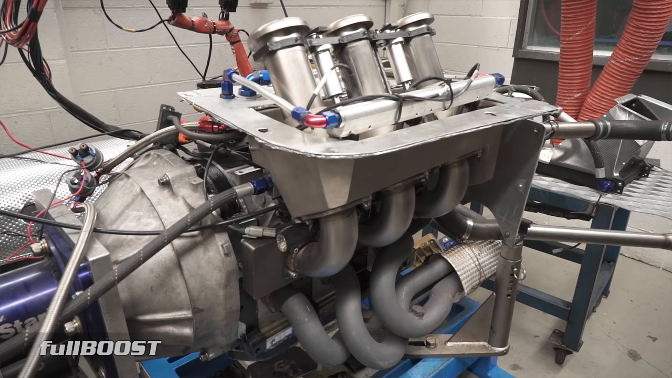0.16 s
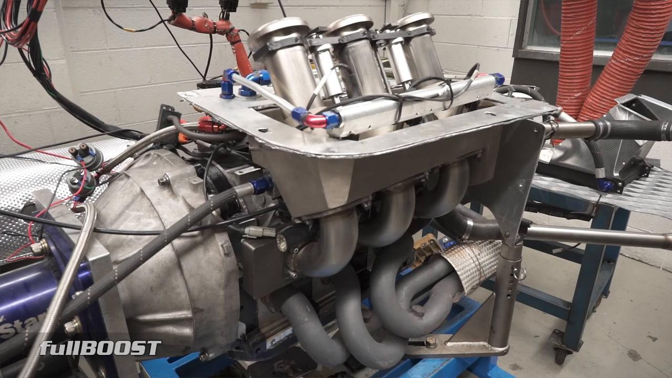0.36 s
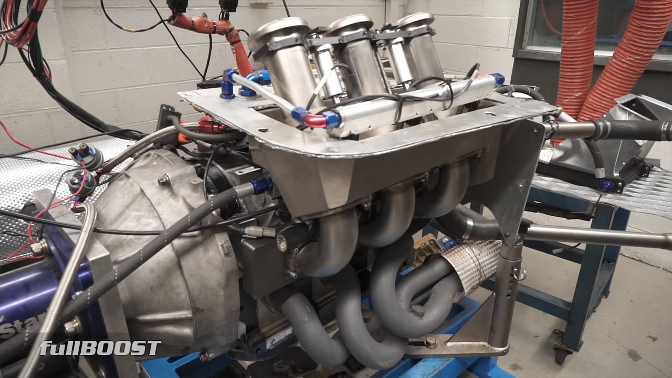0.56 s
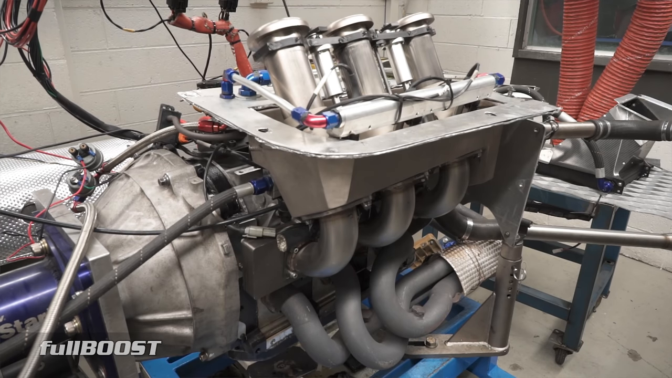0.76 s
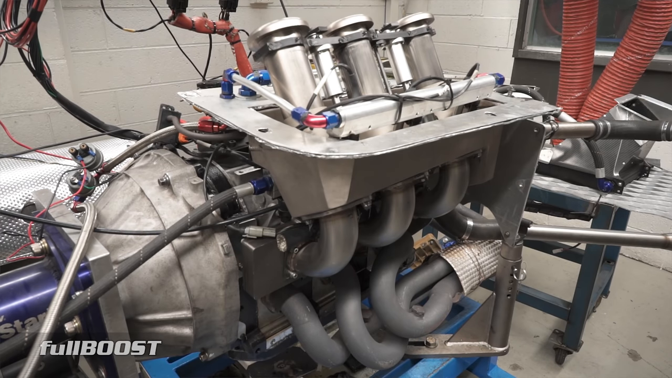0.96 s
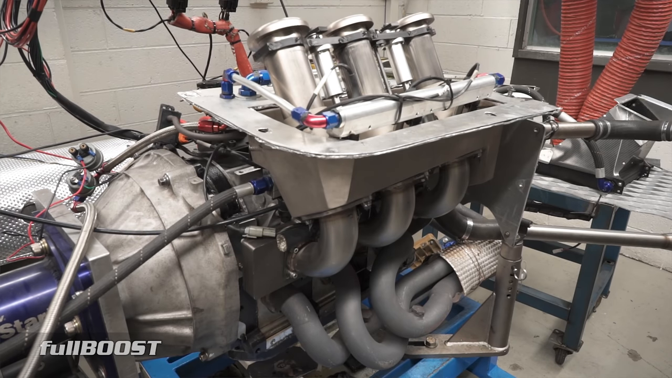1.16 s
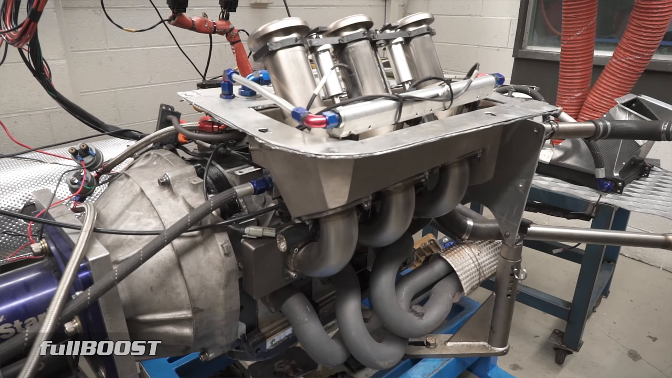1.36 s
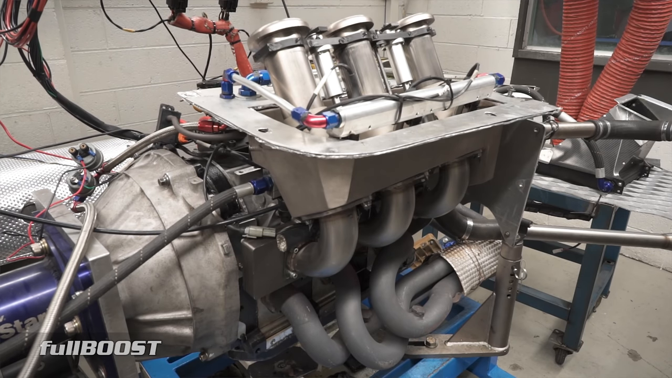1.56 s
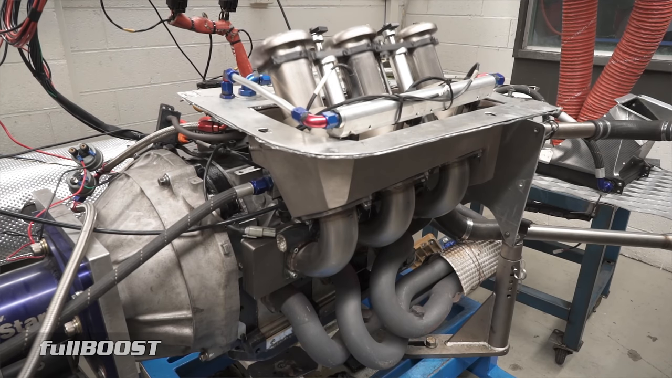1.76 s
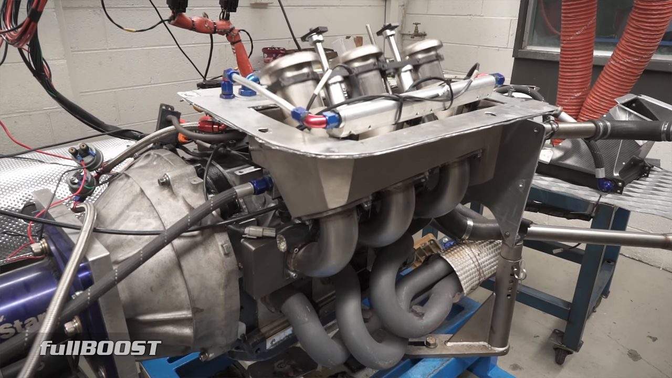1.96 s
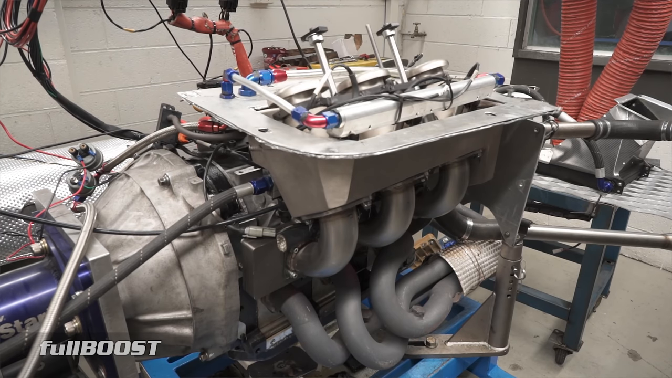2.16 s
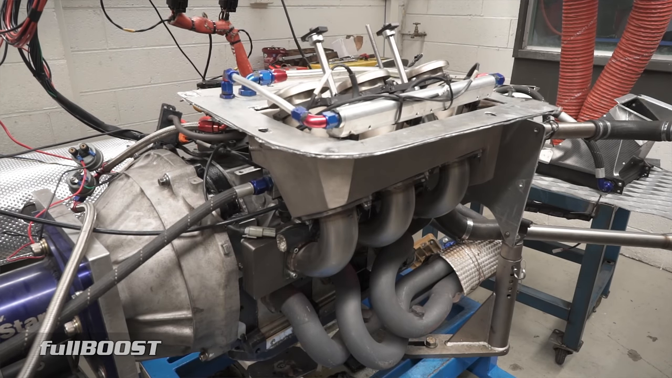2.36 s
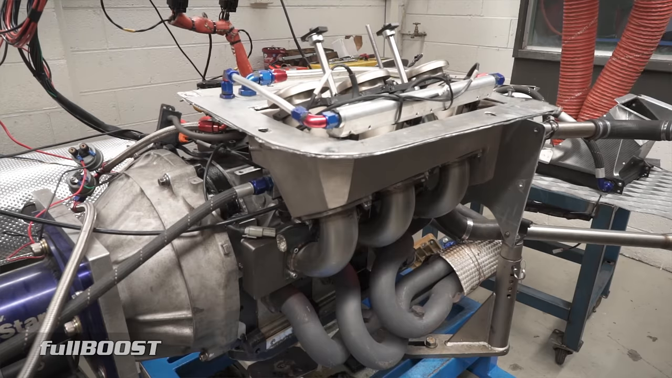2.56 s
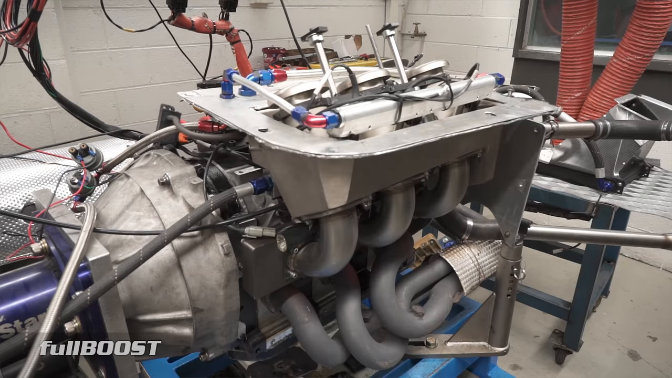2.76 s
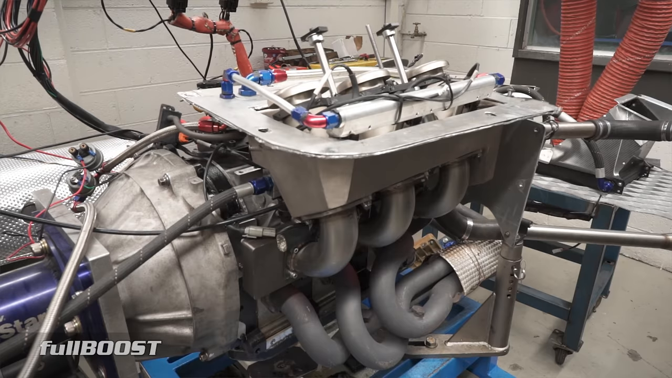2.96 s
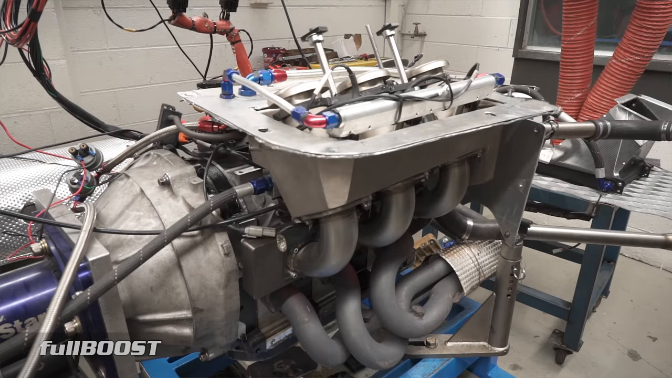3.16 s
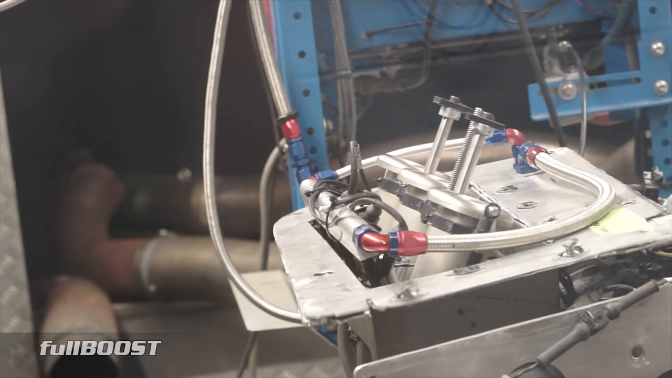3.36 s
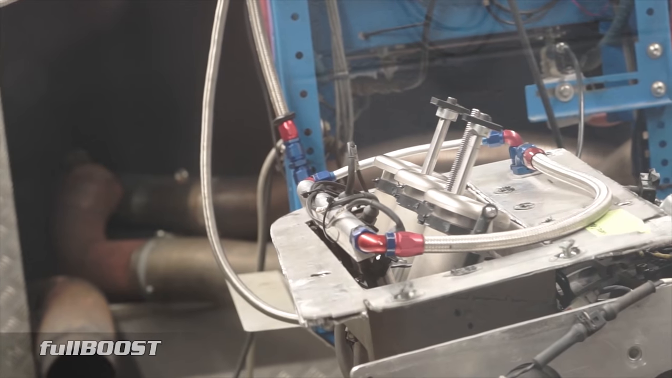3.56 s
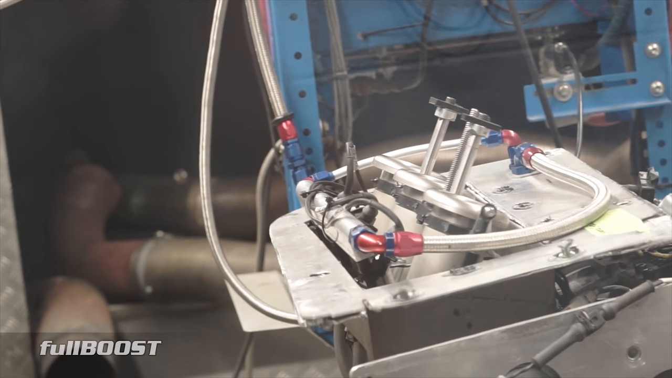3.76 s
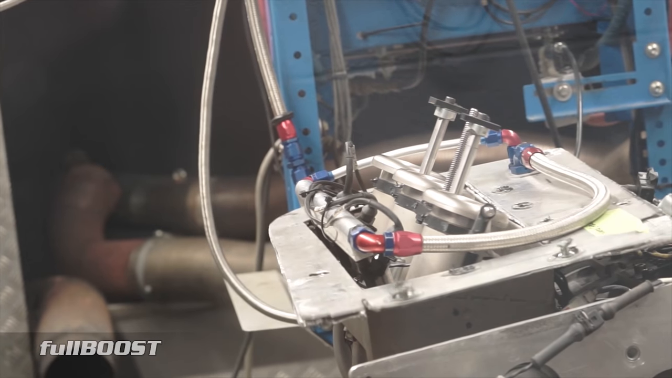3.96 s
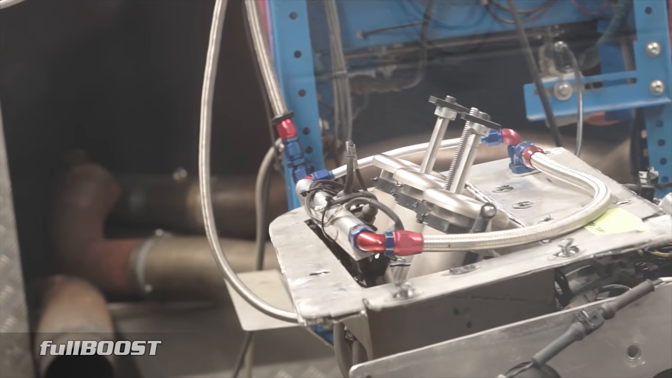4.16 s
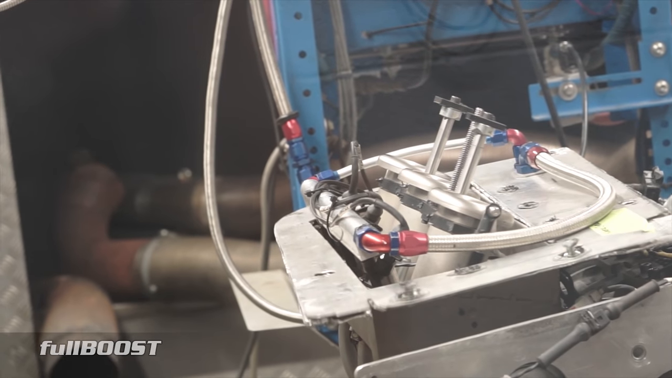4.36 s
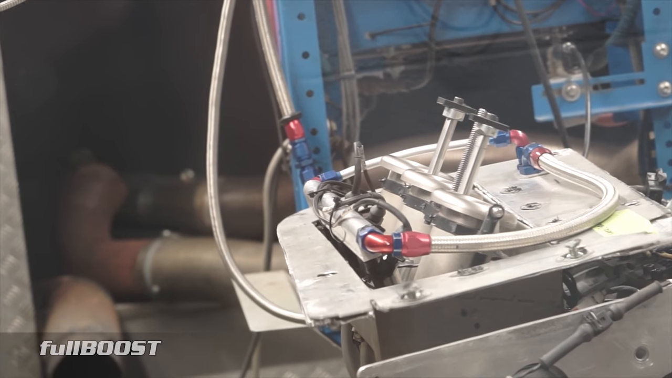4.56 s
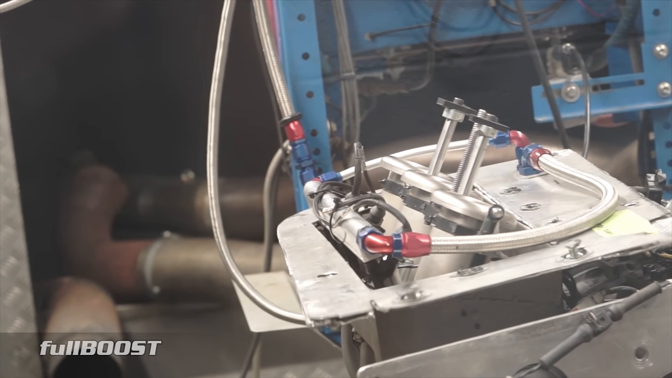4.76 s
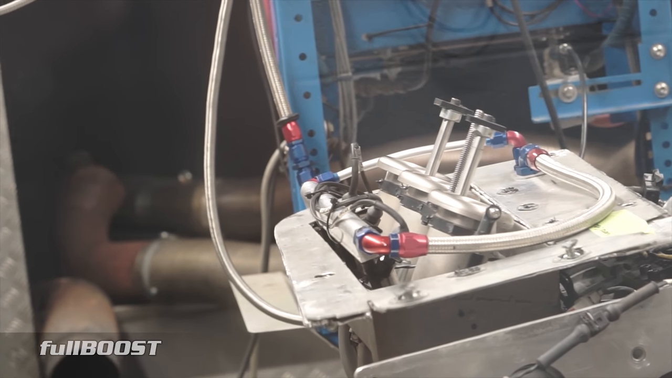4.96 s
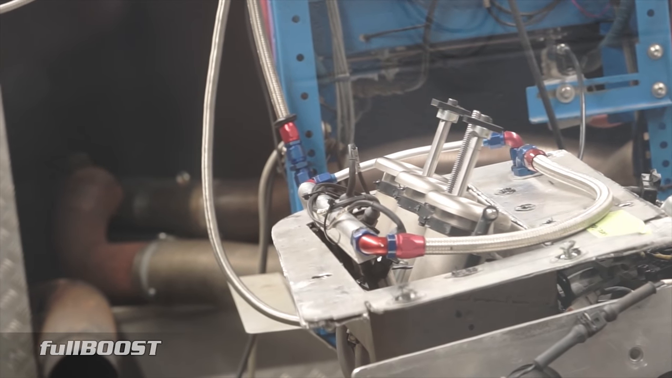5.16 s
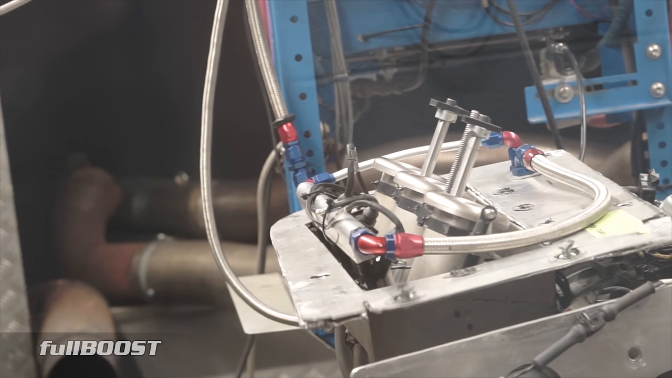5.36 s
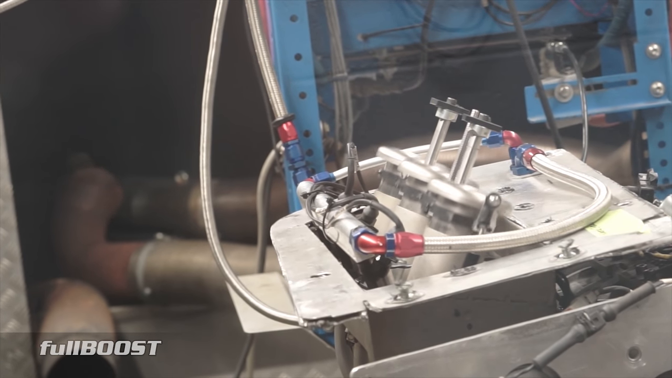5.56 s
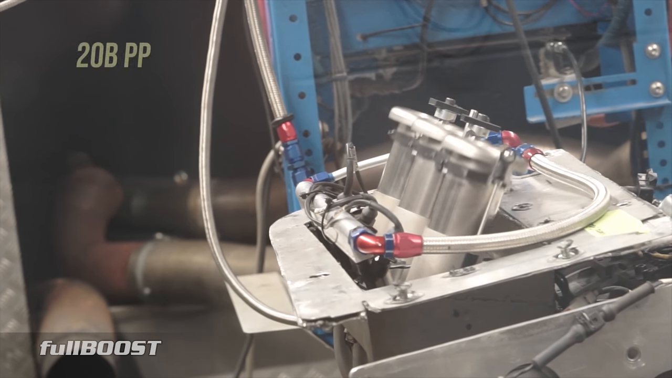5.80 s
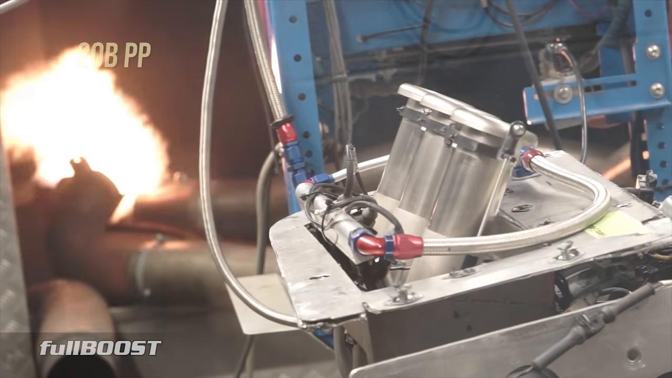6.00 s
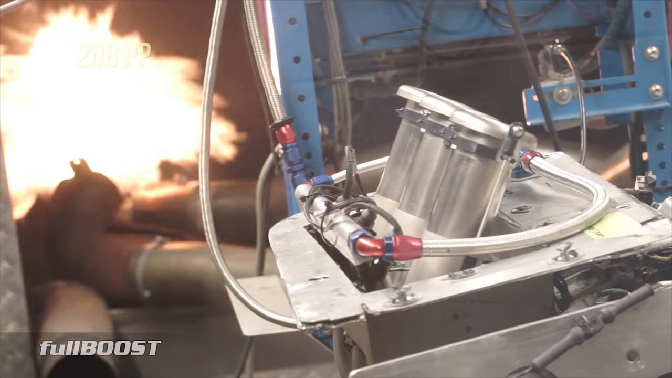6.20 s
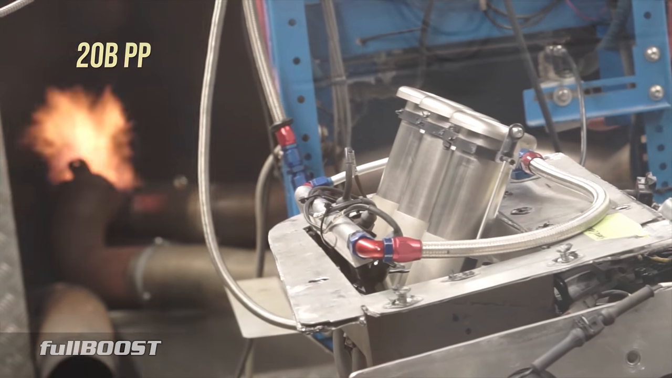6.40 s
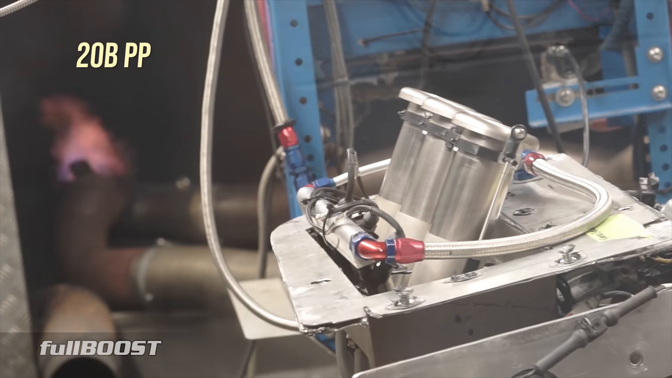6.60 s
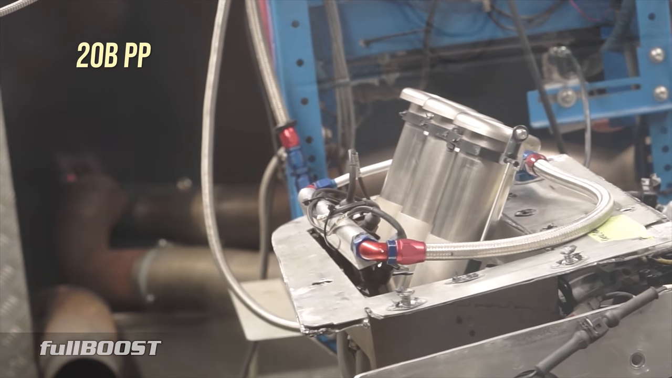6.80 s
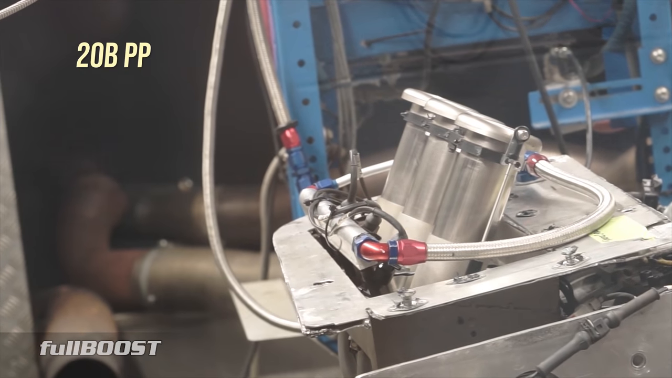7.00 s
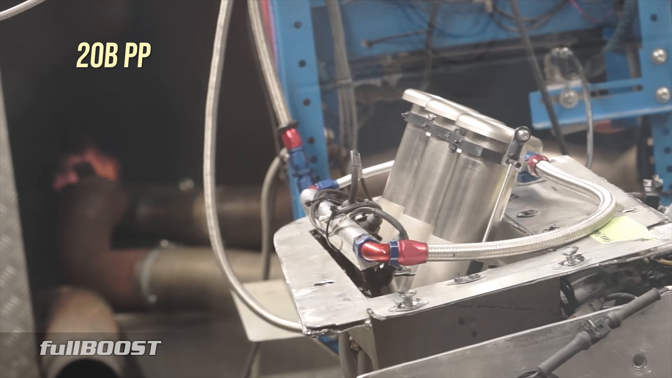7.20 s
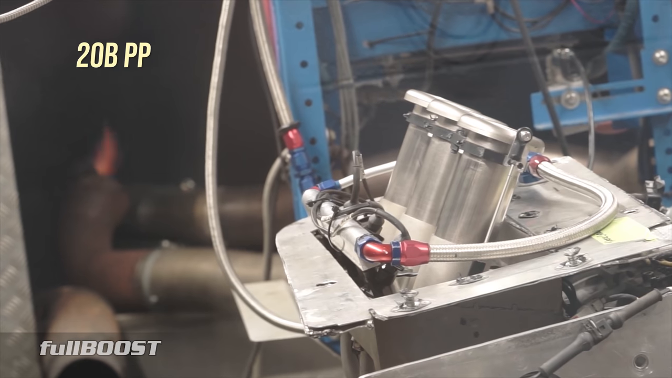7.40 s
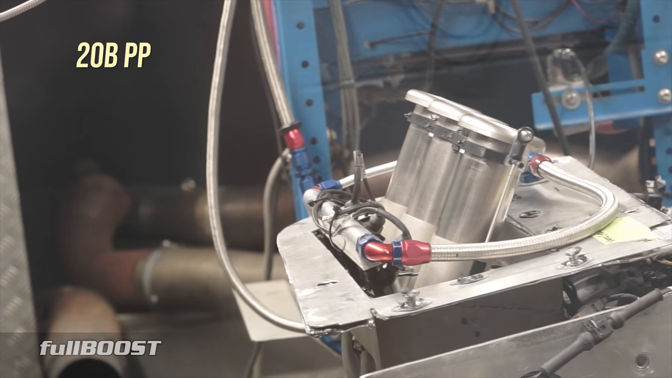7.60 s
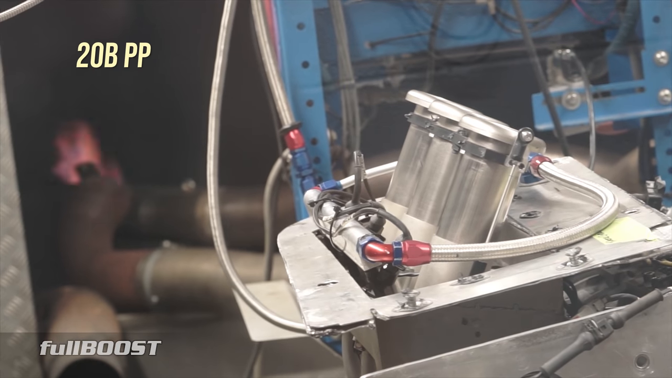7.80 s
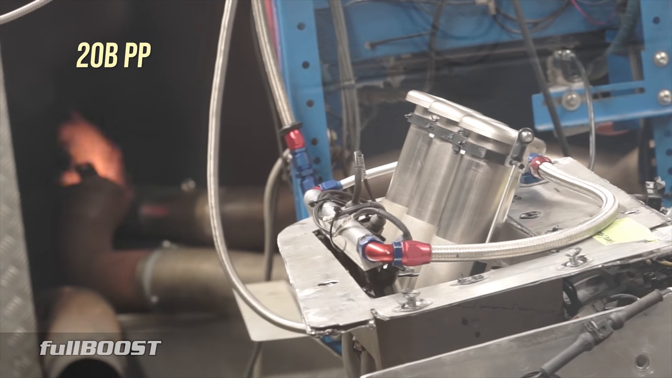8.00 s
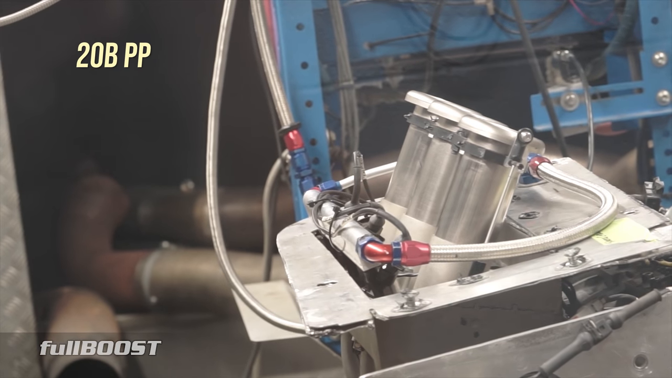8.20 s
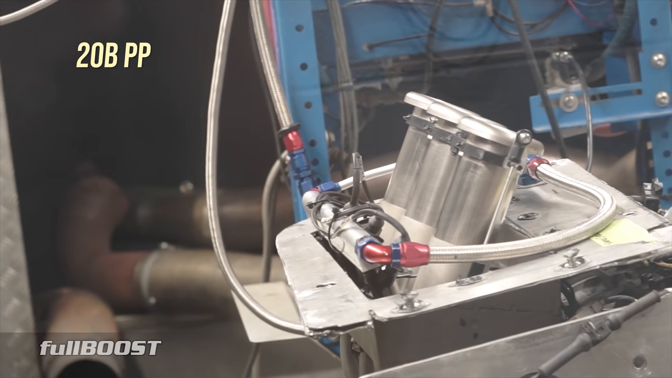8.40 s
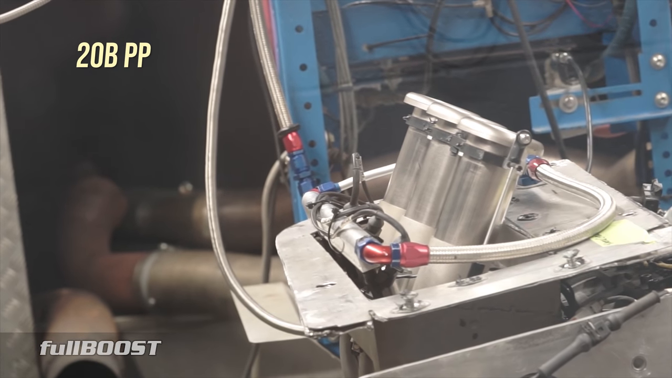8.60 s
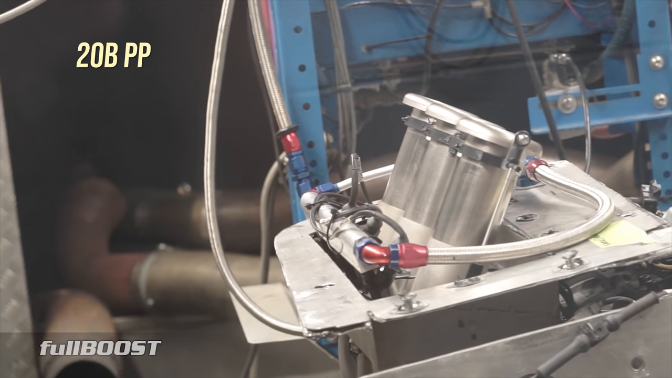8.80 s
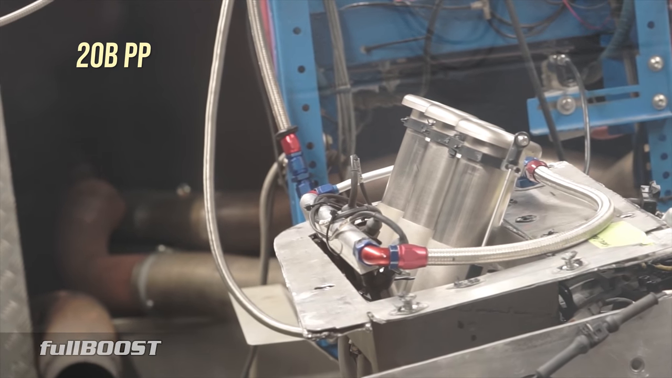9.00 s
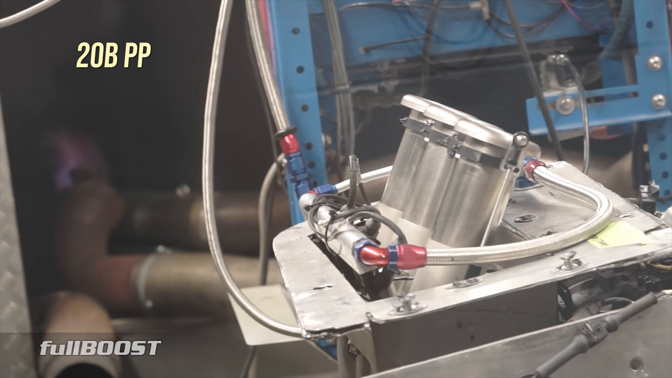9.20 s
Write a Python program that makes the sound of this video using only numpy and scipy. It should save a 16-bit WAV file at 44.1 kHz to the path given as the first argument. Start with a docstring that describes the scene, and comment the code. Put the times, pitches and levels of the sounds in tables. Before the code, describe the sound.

Inside a hard-walled engine test cell, picked up closely in stereo, a three-rotor engine is already screaming at full throttle. From 0 to 5 seconds its firing note climbs from about 320 to 470 Hz, with a dense, raspy buzz, broad roar and bright hiss; harmonics swell and vanish across resonances, and single higher tones flare briefly. Around 5.1 the pitch drops abruptly and wavers. At 5.5 the throttle closes: the howl plunges and dies within half a second into a hollow rush, with soft afterburn puffs near 6.0 and 6.4. A much quieter, low idle emerges, weak and ragged at first. From about 7.5 it lopes in surges every quarter second, each beginning with a gulp of air, then speeding up with uneven firings, ringing pipes, low booms and dull pops. Airy fizz and faint, fuzzy high whistles grow alongside, and the surging idle strengthens to the end, past 9 seconds.

```python
"""In a hard-walled test cell, a three-rotor engine pulls through its revs at full throttle, then is shut down to idle.
Shaft orders, as sines, swell and fade across fixed resonances and nulls, while single upper orders flare.
Pulse trains with wall reflections make the exhaust rasp; filtered noise makes the roar, hiss and run-down rush.
At idle, surges of uneven firings ring the exhaust pipes, with low booms and noise pops.
Filtered noise and fuzzy whistles give the air at the throttles.
"""
import sys
import numpy as np
from scipy import signal
from scipy.fft import rfft, irfft
from scipy.io import wavfile
from scipy.ndimage import uniform_filter1d

SR = 44100
rng = np.random.default_rng(int(sys.argv[2]) if len(sys.argv) > 2 else 0)


def wav_out(sig):
    """Save sig, one row per channel (or a flat mono array), as 16-bit PCM at SR to the path in sys.argv[1]."""
    wavfile.write(sys.argv[1], SR, np.round(np.clip(np.atleast_2d(sig).T, -1, 1) * 32767).astype(np.int16))


N = 407925
TIME = np.arange(N) / SR
BINS = np.fft.rfftfreq(N, 1 / SR)

# Spectrum of flow hiss, in the pull and in the idle's gulps.
# Each row: frequency in Hz, relative density in dB per Hz.
HISS_SPECTRUM = [(2000, -18.5), (3000, -3), (4500, -5.5), (5400, -5), (6200, -1.5), (7200, -8.5),
                 (9500, -9.5), (12000, -12), (15500, -35)]


def pull():
    """Order and flow noise: the firing cycle yields tones, pulses and puffing gas, which die as the shaft coasts."""
    # Shaft speed under load. Each row: time in seconds, speed in turns per second before coasting.
    speed_rows = [(0.0, 106.0), (0.45, 112.3), (0.61, 112.4), (0.78, 115.5), (1.06, 116.7), (1.27, 120.0),
                  (1.89, 124.6), (2.08, 128.3), (2.23, 128.6), (2.64, 133.3), (3.37, 139.5), (4.32, 149.5),
                  (4.56, 150.9), (4.8, 154.5), (5.06, 156.4), (5.17, 147.4), (5.38, 150.4), (5.53, 148.4)]
    # Level of the pull. Each row: time in seconds, rasp and hiss in dB before each layer's trim.
    level_rows = [(0, -20, -28), (1.08, -22.5, -29.5), (1.17, -19.5, -29.5), (2.1, -22, -30.5),
                  (2.72, -24, -34), (3, -22, -26.5), (4.15, -22.5, -29), (4.9, -20, -24),
                  (5.15, -23, -28.5), (5.5, -22.5, -27)]
    # Spectrum of the roar. Each row: frequency in Hz, relative density in dB per Hz.
    roar_spectrum = [(25, -32), (70, -25), (150, -12), (280, -8.5), (450, -4.5), (750, -2.5), (1100, 0),
                     (2000, 2.5), (3000, -2.5), (4500, -22)]
    shut_s, coast_s = 5.5, .6  # throttle closing time; time constant of the shaft speed
    die_db, die_s = -29, 0.3  # final drop of the sound; its time constant
    roar_trim_db, hiss_trim_db = -7.5, -2.6

    coasting_s = np.maximum(TIME - shut_s, 0)
    speed = curves(speed_rows)[0] * np.exp(-coasting_s / coast_s)
    turns = np.cumsum(speed) / SR
    shut = np.minimum(coasting_s / 0.085, 1)
    dying = amp(die_db * (1 - np.exp(-coasting_s / die_s)))
    rasp_db, hiss_db = curves(level_rows)

    tones = drone(speed, turns, shut) + flares(turns)
    tones *= np.interp(TIME, [5.9, 6.1], [1, 0])
    # gas puffs once per turn and three times per turn
    puffs = evened(1 + 0.058 * np.cos(2 * np.pi * turns) + 0.12 * np.cos(6 * np.pi * turns))
    puffs = puffs * amp(0.86 * wander(98))
    roar = amp(rasp_db + roar_trim_db) * gas_noise(puffs, roar_spectrum)
    hiss = amp(hiss_db + hiss_trim_db + 1.6 * wander(8)) * gas_noise(puffs, HISS_SPECTRUM)
    loaded = np.sqrt(1 - shut) * (rasp(turns, rasp_db) + roar + hiss)
    coasting = np.sqrt(shut) * np.interp(TIME, [6.3, 6.7], [1, 0]) * rundown(puffs, rasp_db)
    return dying * (tones + loaded + coasting)


def drone(speed, turns, shut):
    """Order tracking: each harmonic of shaft speed takes the cell's response at its own moving frequency."""
    # Shaft orders 1 to 6; order 3 is the firing note. Each entry: rms level in dB before response and trim.
    order_levels = [-36.5, -39, -21.5, -31, -37, -27.5]
    # Resonances of exhaust and cell. Each row: centre in Hz, half width in Hz, level change in dB.
    resonances = [(121.4, 7.7, 10), (269, 50.5, 10), (293, 7.3, 6), (335, 19, 6), (397.2, 9.5, 6),
                  (421.5, 2.96, 6), (480, 2.6, 7), (554.7, 5.9, 12.5), (583.3, 74, 11), (580, 12, -0.5),
                  (601, 1.4, 1.5), (659.6, 7.4, 6), (722, 35, 7), (766, 17.2, 9.5)]
    # Standing waves that cancel at the microphone. Each row: centre in Hz, half width in Hz, change in dB.
    nulls = [(118, 4.5, -21), (147.5, 3.3, -10), (232.6, 2.1, -8), (250, 2, -11), (330.9, 2.2, -9.5),
             (344.4, 2.6, -8.5), (358.7, 4.6, -10), (377, 4.2, -6), (428, 1, -16), (542, 18.7, -11.5),
             (674.7, 2.1, -10.3), (787, 2.6, -23), (823.5, 6.8, -23)]
    # countless weaker reflections ripple the response and differ between the ports
    ripple_db, port_ripple_db, port_radians = 2.5, 1.7, 0.39
    pan_offset_db, trim_db = 0.74, -1
    # past the peak of the pull the throttle is eased and the note wavers
    ease_s, ease_waver_db = 5.08, 1.5

    hz = np.arange(1000)
    response_db = bumps(hz, resonances) + bumps(hz, nulls)
    response_db = response_db + ripple_db * np.minimum(ripple(hz), 1)
    port_db = pan_offset_db + port_ripple_db * ripple(hz)
    port_phase = port_radians * ripple(hz)
    sides = np.array([[1], [-1]])
    shake = wander(40)  # shared by all orders
    stumble = shut * wander(35)  # breaks up the phase once the throttle is shut
    eased = np.interp(TIME - ease_s, [0, .25], [0, 1])
    out = np.zeros((2, N))
    for order, db in enumerate(order_levels, 1):
        order_hz = order * speed
        gain_db = np.interp(order_hz, hz, response_db)
        pan_db = np.interp(order_hz, hz, port_db)
        spread = np.interp(order_hz, hz, port_phase)
        phase = 2 * np.pi * (order * turns + rng.random()) + 0.29 * order * stumble
        waver_db = 0.18 * shake + (0.52 + shut) * wander(30) + ease_waver_db * eased * wander(9)
        level_db = db + gain_db + waver_db - 2.0 * order * shut + sides * pan_db / 2
        out += amp(level_db) * np.sqrt(2) * np.cos(phase + sides * spread)
    return amp(trim_db) * out


def flares(turns):
    """Transient resonance: single upper orders sing out as they cross a mode, with a phase offset between ports."""
    # Each row: peak time in seconds, shaft order, rms level in dB before trim, half length in seconds.
    flare_rows = [(.18, 9, -25.5, 0.13), (0.444, 12, -31, 0.15), (1.176, 12, -27, 0.25),
                  (1.536, 9, -27.5, 0.23), (1.943, 13, -27.5, 0.1), (2.098, 14, -27.5, 0.18),
                  (3.05, 13, -25.5, 0.085), (3.394, 14, -23.5, 0.053), (4.114, 14, -24, 0.087),
                  (4.48, 9, -26.5, 0.13)]
    out = np.zeros((2, N))
    for s, order, db, half_s in flare_rows:
        near = abs(TIME - s) < 3 * half_s
        cycles = order * turns[near] + rng.random() + np.array([[0], [.15]])
        swell = np.exp(-((TIME[near] - s) / half_s) ** 2)
        out[:, near] += amp(db + 1.5) * swell * np.sqrt(2) * np.cos(2 * np.pi * cycles)
    return out


def rasp(turns, level_db):
    """Pulse excitation: three interleaved firing trains, each with its own reflections, form a dense harmonic rasp."""
    # Each row: frequency in Hz, relative density in dB per Hz.
    rasp_spectrum = [(600, -54), (830, -5), (1000, 0), (1400, 0.5), (1800, -1), (2050, 1.5), (2600, -1.5),
                     (3300, -4.5), (4300, -11.5), (6000, -9.5), (8000, -18), (15000, -25)]
    rotors = 0
    for rotor in range(3):
        drifting = turns + .008 * wander(9)  # timing drifts between rotors, so the upper orders flicker
        pulses = firings(drifting, rotor, uneven_db=.9, jitter_s=.000008)
        rotors = rotors + cell(pulses, t60=.36, direct=.4)
    return amp(level_db - 3) * at_microphones(rotors, rasp_spectrum)


def rundown(puffs, level_db):
    """Turbulent flow noise: the hollow rush of the coasting engine, with soft afterburns in the exhaust."""
    # Spectrum of the rush. Each row: frequency in Hz, relative density in dB per Hz.
    coast_spectrum = [(47, -42), (85, -19), (112, -17), (140, -22), (200, -15), (380, -3.5), (540, -7.5),
                      (760, -3), (1060, -10.5), (2500, -15.5), (6400, -23.5), (15000, -40)]
    # Each row: afterburn peak in seconds, rise in dB, half length in seconds.
    afterburns = [(5.986, 8, 0.097), (6.385, 6, 0.074)]
    burn_db = bumps(TIME, [(s, half_s, db) for s, db, half_s in afterburns])
    return amp(level_db + burn_db + 6) * gas_noise(puffs, coast_spectrum)


def idle():
    """Unsteady combustion: the engine gulps air, catches, speeds up and drops back in repeated surges."""
    # Each row: time in seconds, firing strength between surges and air at the throttles in dB before trims.
    lope_rows = [(5.55, -31, -66), (6.2, -32, -63), (6.7, -33, -57), (7.3, -35, -54), (7.85, -32, -51.5),
                 (8.72, -25, -48.5), (9.25, -23, -44)]
    # Spectrum of the air fizz. Each row: frequency in Hz, relative density in dB per Hz.
    air_spectrum = [(500, -19), (1500, 0.5), (3500, -7), (6300, -12.5), (7500, -11), (9100, -9),
                    (9600, -2.5), (10400, -3.5), (11200, -8), (12500, -8), (15500, -18)]
    idle_speed, surge_speed = 20.6, 7.5  # turns per second; the second is the limit of a surge's added speed
    gulp_lead_s, gulp_depth = 0.04, 1.14  # gulps come before the firing; depth scales the surge in dB

    fire_db, air_db = curves(lope_rows)
    surge_db = surges(0)
    speed = idle_speed + surge_speed * np.tanh(surge_db / 5) + .4 * wander(7)
    turns = np.cumsum(speed) / SR
    gulp_db = gulp_depth * surges(gulp_lead_s) + .7 * np.cos(6 * np.pi * turns)
    gulps = amp(air_db + gulp_db - 3.0) * gas_noise(1, HISS_SPECTRUM)
    fizz = amp(air_db + 0.25 * wander(34) + 6.0) * gas_noise(1, air_spectrum)
    entry = np.interp(TIME, [5.52, 5.56], [0, 1])
    return entry * (exhaust(turns, fire_db, surge_db) + gulps + fizz + whistles(air_db))


def exhaust(turns, fire_db, surge_db):
    """Resonant pipes: ragged firings excite pipe modes and booming orders, and blow puffs of gas into the cell."""
    # Exhaust pipe resonances. Each row: frequency in Hz, width setting in Hz, relative level in dB.
    pipe_modes = [(26.5, 7.7, -0.5), (67, 8.9, -1.5), (105, 7, 3), (163, 8.7, 5.5), (192.7, 6, 4),
                  (218.5, 8.4, 3.5), (243.2, 8, 3), (267, 9.2, -1), (366, 20, 1.5), (397.8, 7.4, 4),
                  (523.3, 13.5, -3), (618, 5.7, 2)]
    # Orders that boom in turn in each surge. Each row: order, relative level in dB, lead in seconds.
    boom_rows = [(3, -19.5, 0.073), (6, -10.5, 0.011), (14, -16, 0.00049)]
    # Spectrum of the pops. Each row: frequency in Hz, relative density in dB per Hz.
    pop_spectrum = [(60, -19), (120, -23), (250, -0.5), (450, 3.5), (800, -1), (1100, -7), (1500, -15),
                    (2200, -19), (3500, -35), (6200, -27.5), (9000, -27.5), (15000, -37)]
    boom_depth = 1.88  # scales the surge in dB

    pulses = 0
    for rotor, db in enumerate([0, -6, -2]):
        pulses = pulses + amp(db) * firings(turns, rotor, uneven_db=3, jitter_s=.001)
    # each puff decays with a 0.06 s time constant
    puffs = evened(signal.lfilter([1], [1, -np.exp(-1 / (0.06 * SR))], pulses))
    drive = evened(pulses) + .55 * puffs * rng.standard_normal(N)
    # squared resonances have steep skirts, which keep the gaps dark
    ring = sum(amp(db) / (1 + 1.3j * (BINS - hz) / width) ** 2 for hz, width, db in pipe_modes)
    pipes = amp(fire_db + .6 * surge_db - 1.5) * evened(irfft(rfft(drive) * ring, N))
    boom = 0
    for order, db, lead_s in boom_rows:
        boom_db = fire_db + db + boom_depth * surges(lead_s) + 1.3 * wander(25)
        boom = boom + amp(boom_db) * np.sqrt(2) * np.sin(2 * np.pi * order * turns)
    pops = amp(fire_db + 0.73 * surge_db - 6.0) * gas_noise(puffs, pop_spectrum)
    return np.interp(TIME, [5.8, 6.45], [.25, 1]) * (pipes + boom) + pops


def surges(lead_s):
    """Intermittent combustion: bell-shaped level rises in dB as the rotors catch and drop out again."""
    # Each row: peak time in seconds, rise in dB.
    surge_rows = [(6.55, 1), (6.99, 2.5), (7.23, 3), (7.5, 7), (7.73, 8), (7.96, 7), (8.17, 7.5), (8.39, 8),
                  (8.62, 8), (8.87, 7), (9.09, 6.5), (9.3, 6)]
    half_s = .065
    return bumps(TIME + lead_s, [(s, half_s, db) for s, db in surge_rows])


def whistles(air_db):
    """Flow tones: air past nearly shut throttles sings at fixed pitches, fuzzed by random amplitude modulation."""
    # Each row: frequency in Hz, level in dB relative to the air, before trim.
    whistle_rows = [(8942, -66), (9728, -62), (10347, -62), (10427, -64), (10896, -66)]
    tones = 0
    for hz, db in whistle_rows:
        tones = tones + amp(db) * wander(35) * np.sqrt(2) * np.cos(2 * np.pi * hz * TIME)
    return amp(air_db + 40) * np.interp(TIME, [5.9, 6.5], [0, 1]) * tones


def firings(turns, rotor, uneven_db, jitter_s):
    """Periodic impulses: one a turn, a third of a turn between rotors, with random strength and timing."""
    count = np.arange(1, int(turns[-1]))
    size, late = rng.standard_normal((len(count), 2)).T
    fire_s = np.interp(count + rotor / 3, turns, TIME) + jitter_s * late
    at = np.clip(fire_s * SR, 0, N - 2)
    size = amp(uneven_db * np.clip(size, -2, 2))
    # share each pulse between its two nearest samples
    whole, part = at.astype(int), at % 1
    return np.bincount(whole, size * (1 - part), N) + np.bincount(whole + 1, size * part, N)


def gas_noise(puffs, spectrum):
    """Turbulence: broadband noise modulated by the flow, then coloured and heard at two ports."""
    return at_microphones(puffs * rng.standard_normal((2, N)), spectrum)


def cell(x, t60, direct):
    """Reverberation: exponentially decaying dense reflections on two unrelated paths, direct sound on the first."""
    t = TIME[:SR // 2]
    tail = rng.standard_normal((2, len(t))) * amp(-60 * t / t60)
    tail /= np.linalg.norm(tail, axis=1, keepdims=True)
    tail[0, 0] += direct
    return signal.fftconvolve(x[None], tail, axes=1)[:, :N]


def at_microphones(pair, spectrum):
    """Spatial coherence: two coloured signals blend by frequency as at two close ports; their mean has rms 1."""
    # Each row: frequency in Hz, likeness of the ports from 0 to 1.
    likeness = [(60, .99), (130, .98), (290, .92), (640, .8), (1100, .6), (2000, .42), (4200, .2),
                (7000, .35), (15000, .5)]
    # Each row: frequency in Hz, phase in radians by which left leads.
    lead_phase = [(20, 0), (430, -.2), (1380, .35), (1900, 1.2), (3000, 1.7), (4500, 4.9), (6000, 5.6),
                  (8300, 6.3)]
    a, b = rfft(pair) * amp(read(spectrum))
    same = np.clip(read(likeness), 0, 1)
    right = (same * a + np.sqrt(1 - same ** 2) * b) * np.exp(-1j * read(lead_phase))
    out = irfft(np.array([a, right]), N)
    return out / np.sqrt(np.mean(out.mean(0) ** 2))


def bumps(x, rows):
    """Superposed resonance curves: sums bell-shaped changes in dB; rows are (centre, half width, dB)."""
    return sum(db * np.exp(-((x - centre) / width) ** 2) for centre, width, db in rows)


def ripple(hz):
    """Multipath interference: random hills and dips a few Hz wide, growing with the root of frequency."""
    rough = uniform_filter1d(uniform_filter1d(rng.standard_normal(len(hz)), size=4), size=3)
    return evened(rough - uniform_filter1d(rough, size=15)) * np.sqrt(hz / 500)


def wander(hz):
    """Band-limited fluctuation: smoothed random points give slow chance of rms 1, up to about the given rate."""
    points = uniform_filter1d(uniform_filter1d(rng.standard_normal(2 ** 15), 6), 5)
    return evened(np.interp(TIME * 16 * hz, np.arange(2 ** 15), points))


def amp(db):
    """Decibel law: the amplitude ratio of a level."""
    return 10 ** (np.asarray(db) / 20)


def evened(x):
    """Root-mean-square normalisation: scales to rms 1."""
    return x / np.sqrt(np.mean(x ** 2) + 1e-20)


def curves(rows):
    """Linear interpolation in time: each value column of a table at every sample."""
    s, *columns = np.transpose(rows)
    return [np.interp(TIME, s, c) for c in columns]


def read(points):
    """Interpolation on a logarithmic frequency scale: a spectrum table at every bin."""
    hz, value = np.transpose(points)
    return np.interp(np.log(BINS + 1), np.log(hz + 1), value)


def scene():
    """Superposition: the pull runs down into the idle, under one drifting level difference between the ports."""
    # Each row: time in seconds, left minus right level in dB.
    pan_rows = [(0, 1.1), (2.3, 1.6), (3.2, 2.1), (5.5, 0.23), (9.25, 2.4)]
    pan_db = curves(pan_rows)[0]
    return (pull() + idle()) * amp(np.array([pan_db, -pan_db]) / 2)


def record(dry):
    """Band limitation: a linear-phase low-pass filter removes the extreme treble."""
    edge_hz = 15700
    low_pass = signal.firwin(801, edge_hz, window=("kaiser", 9), fs=SR)
    return signal.oaconvolve(dry, low_pass[None], "same")


dry = scene()
out = record(dry)
wav_out(out)
```